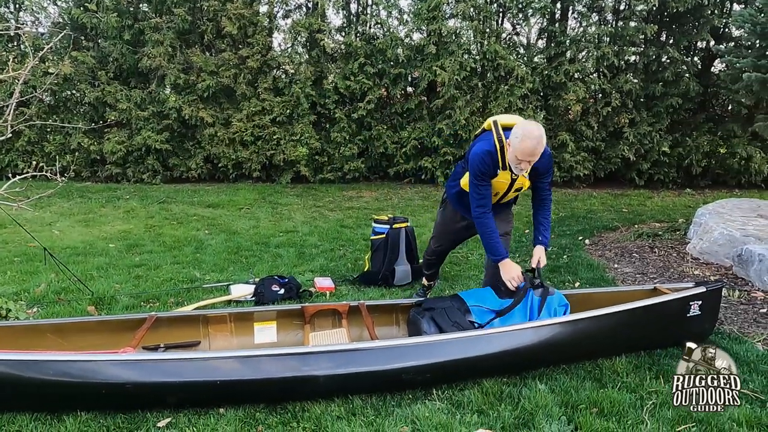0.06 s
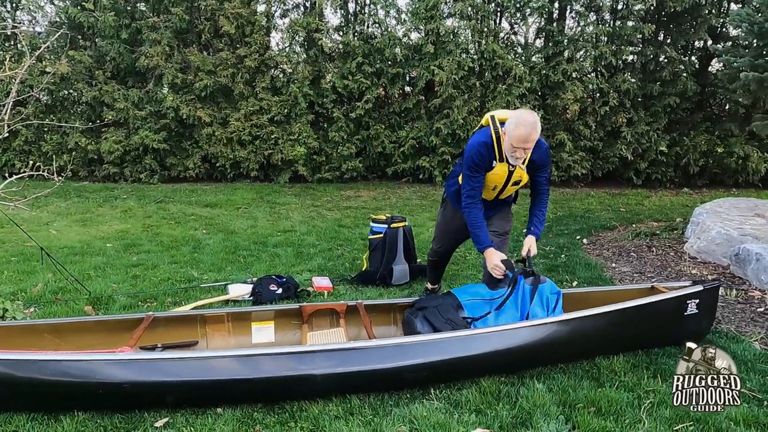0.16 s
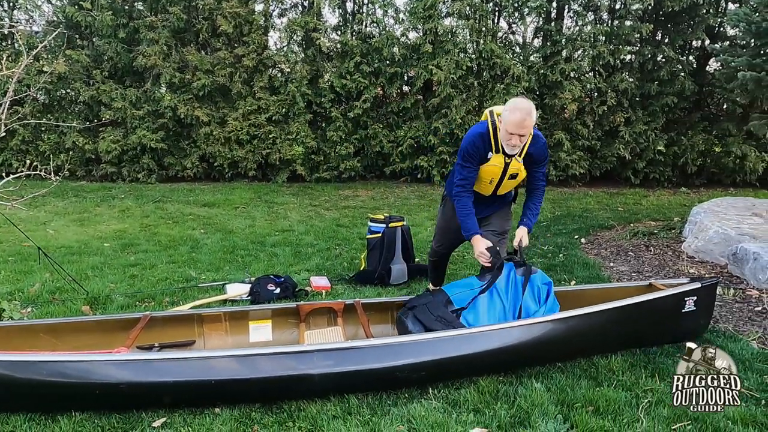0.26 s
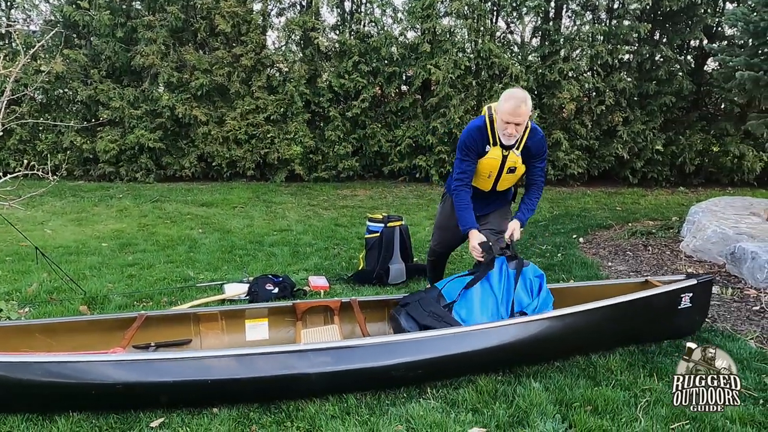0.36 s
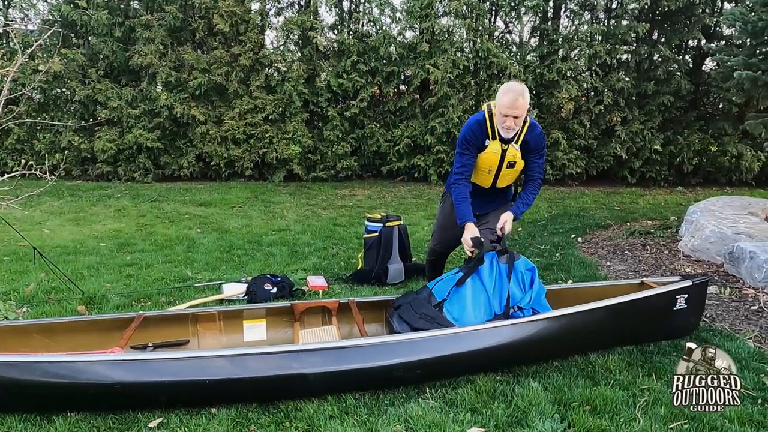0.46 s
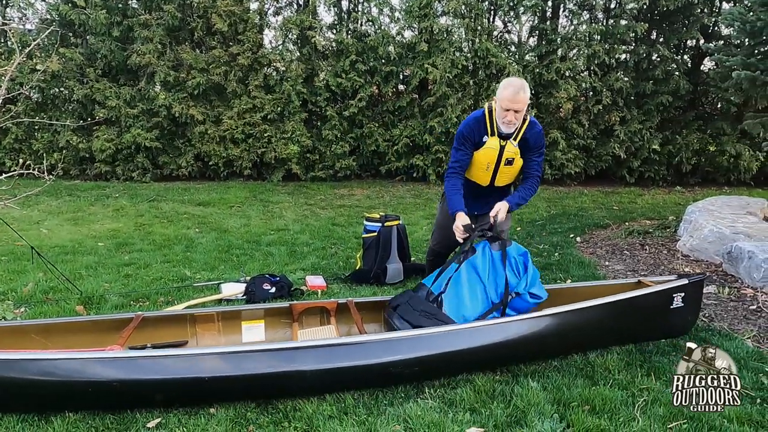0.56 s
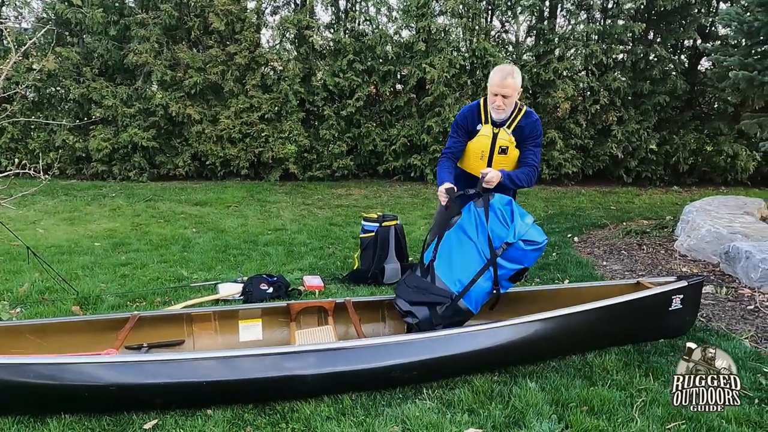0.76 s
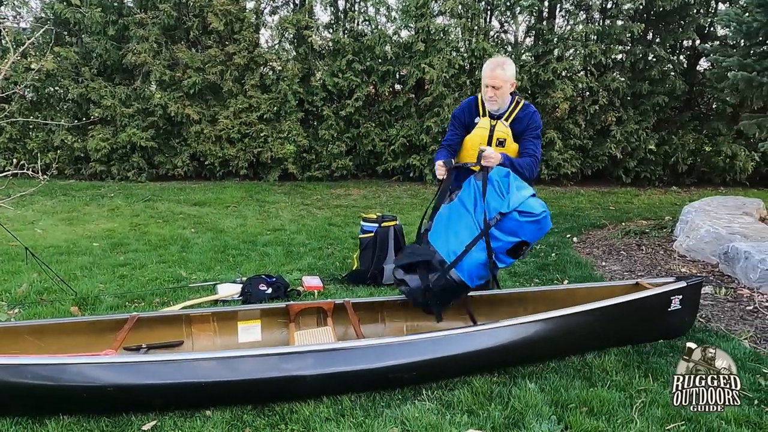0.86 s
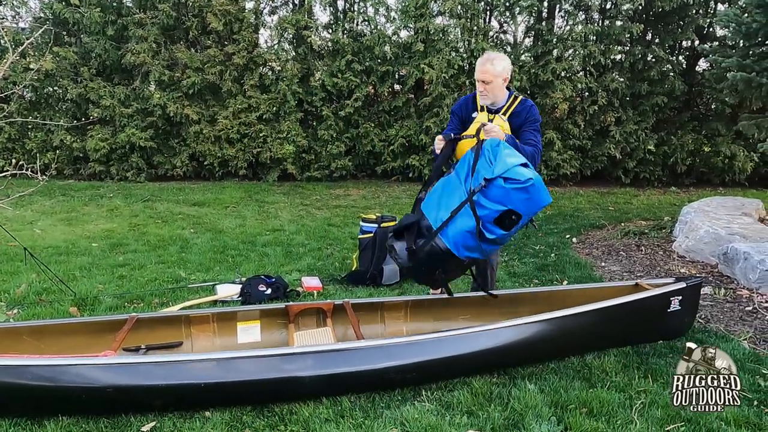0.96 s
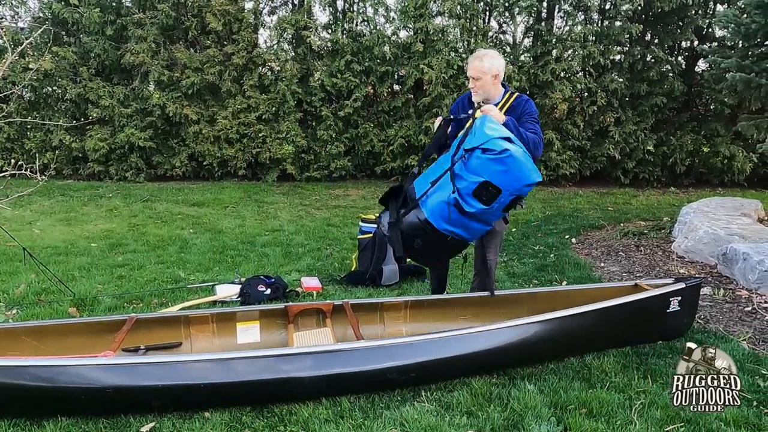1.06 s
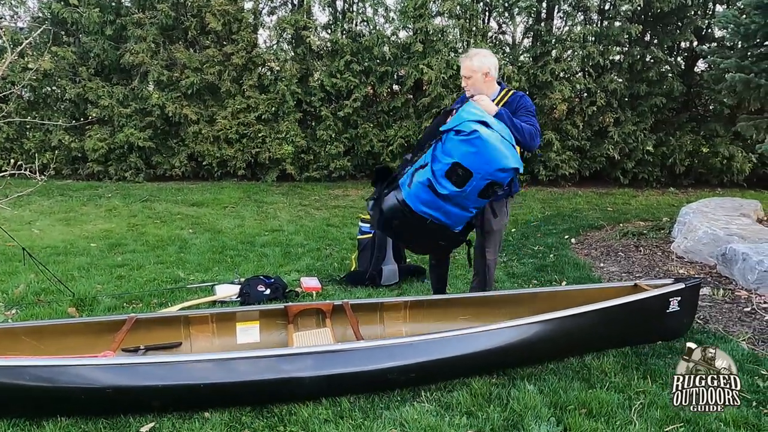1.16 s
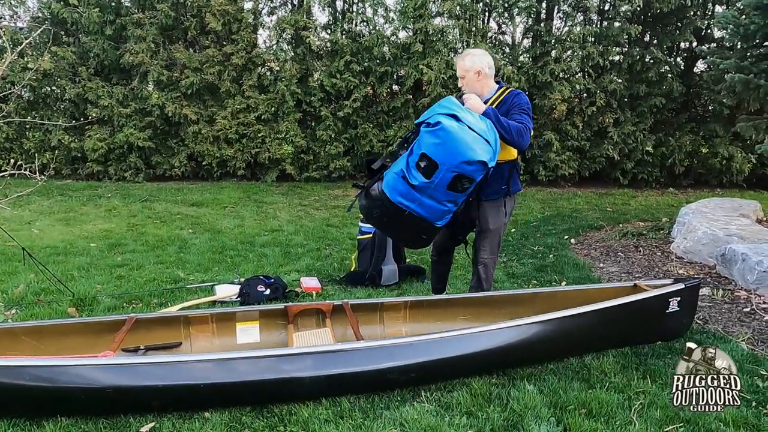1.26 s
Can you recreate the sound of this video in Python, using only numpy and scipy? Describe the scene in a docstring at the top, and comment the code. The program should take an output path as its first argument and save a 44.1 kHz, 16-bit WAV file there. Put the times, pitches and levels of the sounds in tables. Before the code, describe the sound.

A heavy bag scrapes and bumps over a thin canoe hull, straight ahead on a quiet lawn. The rubbing swells with hollow thumps, squeaky straps and buckle knocks, then dies away as the bag is lifted.

```python
"""On a quiet lawn, a heavy pack is dragged along the inside of a canoe and lifted clear.
Its fabric rubs over the thin hull, its weight thumps the floor, straps scrape and squeak,
buckles knock against the side and taut nylon swishes. The hull rings with the contacts and
rumbles as it shifts on the grass. Once the pack is in the air, only a faint rustle is left
over a soft bed of outdoor air."""
import sys
import numpy as np
from scipy import signal
from scipy.fft import rfft, irfft, next_fast_len
from scipy.io import wavfile
from scipy.ndimage import uniform_filter1d, minimum_filter1d

SR = 44100
rng = np.random.default_rng(int(sys.argv[2]) if len(sys.argv) > 2 else 0)


def bounce(signal):
    """Save signal as a 16-bit WAV file at the path given by the first command-line argument."""
    frames = np.transpose(np.atleast_2d(signal))
    limited = np.clip(frames, -1, 1)
    pcm = np.round(limited * 32767).astype(np.int16)
    wavfile.write(sys.argv[1], SR, pcm)


N = 57330
TIME = np.arange(N) / SR

# swell of the pack rubbing on the hull: (time [s], level [dB])
DRAG_ENVELOPE = [(0, -61), (.075, -49), (.095, -37.5), (.155, -42), (.22, -35), (.27, -30), (.31, -32.5),
                 (.46, -34), (.53, -23.5), (.62, -33.5), (.67, -26), (.755, -33.5), (.79, -26.5),
                 (.85, -26.5), (.945, -34.5), (1.0, -25), (1.07, -47), (1.17, -59.5), (1.3, -90)]
# warm body of the rub: (frequency [Hz], relative level [dB])
DRAG_EQ = [(40, -40), (100, -4), (200, 6), (340, 0.5), (600, 0), (1300, -7), (2500, -10.5), (4000, -18),
           (7000, -25), (12000, -35)]
# the load bumping the floor, pitched by where it presses: (time [s], level [dB], pitch [Hz])
THUMP_HITS = [(0.049, -35.5, 124), (.101, -36.5, 191), (0.274, -32, 228), (0.333, -26, 176),
              (.479, -10.5, 161), (.497, -12.5, 194.7), (.515, -8.5, 205), (0.539, -16, 254.7),
              (.556, -21.5, 251), (.581, -20.5, 255.4), (.603, -20, 246), (0.642, -18, 164),
              (.690, -27.5, 256), (0.833, -18.5, 264), (0.889, -16, 224), (.913, -20, 194),
              (.969, -20.5, 270.6), (1.008, -26.5, 263)]
# floor, damped by the load: (multiple of the pitch, relative level [dB], t60 [s])
LOADED_FLOOR_MODES = [(.68, -11.5, 0.1), (1, 1.5, 0.13), (1.3, -12.5, 0.07)]
# straps scraping over the side: (time [s], attack [s], time to release [s], level [dB],
# bass [dB], treble [dB], squeak pitch [Hz], squeak gain [dB])
STRAP_STROKES = [(0.16, 0.0026, .024, -33.5, -6, -27, 1030, 3.5),
                 (0.231, 0.0012, 0.013, -38.5, 6, -7, 1710, 19.5),
                 (0.255, 0.01, 0.01, -36.5, 1, 8.5, 1760, 20),
                 (0.473, 0.0015, 0.0016, -30, -7, 2, 1296, 21.5),
                 (0.509, 0.0017, 0.012, -18.5, -9, -14, 1900, -4.5),
                 (0.555, 0.0031, 0.01, -25.5, 11, -27, 2520, -11),
                 (.579, 0.0047, 0.0038, -24, -2, -20, 1990, -15),
                 (0.645, .001, 0.0092, -26, 6.5, 0, 1405, -1.5),
                 (0.667, 0.011, 0.017, -22, 4, 8.5, 2030, -8), (0.784, 0.0043, .03, -26.5, -5, -9, 770, 1),
                 (0.827, 0.0027, 0.017, -29, 10.5, -2, 780, 0),
                 (0.865, 0.0036, 0.025, -16, -18.5, -0.5, 3280, 5),
                 (0.89, 0.007, 0.018, -18, 4, 0, 2680, 12), (.957, 0.0013, 0.011, -20, 0, 12.5, 650, 6),
                 (0.992, 0.0046, 0.013, -33, 4, 11, 1700, 12)]
# midrange rasp of the straps: (frequency [Hz], relative level [dB])
STRAP_EQ = [(50, -46), (200, 1), (340, 1), (550, 5.5), (900, -0.5), (1400, -2), (2200, -2), (3400, -7),
            (4500, -9), (7000, -18), (12000, -35.5)]
# buckles and frame striking the hull: (time [s], level [dB], bass [dB], treble [dB])
KNOCK_HITS = [(0.09, -32.5, -6, -3), (.234, -39, -8, -8), (0.329, -24, 2.5, -2), (.364, -40, -30, 15),
              (0.436, -33, -23, 7), (0.5248, -18.5, 7, -22), (0.7661, -14.5, -33, 1),
              (.773, -14, -1.5, -23), (0.963, -28, 5, -8)]
# hollow tone of the knocks: (frequency [Hz], relative level [dB])
KNOCK_EQ = [(50, -5), (200, 6), (400, 2.5), (750, 9.5), (1400, -0.5), (2500, -2), (4500, -8), (7000, -16),
            (12000, -29)]
# free sides of the hull: (frequency [Hz], relative level [dB], t60 [s])
SIDE_MODES = [(98, -8, .3), (194, 2, .28), (246, 4, .33), (278, 0, .28), (403, -4, .22), (438, -4, .25),
              (524, 1, .22), (607, -5, .16), (846, 0, .12), (932, -4, .10), (1030, -4, .08),
              (2271, -2, .08), (2810, -3, .06), (3358, -5, .08)]
# taut nylon sliding: (peak time [s], half length [s], level [dB])
NYLON_SWELLS = [(0.5, 0.0061, -50), (0.685, 0.0087, -37), (0.907, 0.01, -38.5), (0.974, 0.0044, -53),
                (0.994, 0.0059, -60)]
# sheen of the nylon: (frequency [Hz], relative level [dB])
NYLON_EQ = [(1000, -30), (3000, -6), (6500, -13), (9000, 4), (11500, 9), (14000, -25)]
# the whole canoe shifting under the load: (time [s], level [dB])
RUMBLE_ENVELOPE = [(0, -44.5), (.25, -45.5), (.5, -43), (.72, -40), (.92, -74), (1.05, -45.5), (1.3, -61)]
# low weight of that shifting: (frequency [Hz], relative level [dB])
RUMBLE_EQ = [(25, -19), (45, -3), (70, 1), (130, 5), (250, -24.5), (800, -44.5)]
# outdoor bed: (frequency [Hz], relative level [dB])
AIR_EQ = [(25, -24), (60, -15.5), (115, 1.5), (180, -7), (350, -16.5), (800, -23), (1600, -28.5),
          (2600, -25), (4500, -39), (12000, -63)]


def drag():
    """The pack's fabric bottom rubs along the hull in uneven swells."""
    return coloured(friction(judder_db=1.64) * envelope(DRAG_ENVELOPE), DRAG_EQ)


def friction(judder_db, judder_hz=104, catches_per_s=4500, spread_db=0.93, hiss_gain=0.66):
    """The weave catches in tiny grains over a smooth hiss, juddering as it sticks and slips."""
    sizes = from_db(spread_db * np.minimum(rng.exponential(1, N), 3)) * rng.choice([-1, 1], N)
    catches = rms_one(sizes * (rng.random(N) < catches_per_s / SR))
    judder = rms_one(butter(rng.standard_normal(N), judder_hz, "low"))
    hiss = hiss_gain * rng.standard_normal(N)
    return rms_one((catches + hiss) * from_db(judder_db * judder))


def floor_thumps(contact_s=0.0026):
    """Soft pushes from the pack's weight set the loaded floor booming briefly."""
    boom = 0
    for start, db, hz in THUMP_HITS:
        push = np.sin(np.pi * np.clip((TIME - start) / contact_s, 0, 1))
        force = from_db(db) * push / push.sum() + 1e-18
        for multiple, mode_db, t60 in LOADED_FLOOR_MODES:
            radius = np.exp(-np.log(1000) / (t60 * SR))
            angle = 2 * np.pi * hz * multiple / SR
            ring = signal.lfilter([0, np.sin(angle)], [1, -2 * radius * np.cos(angle), radius ** 2], force)
            boom += from_db(mode_db) * ring
    return butter(boom, hz=129, kind="high")  # the thin shell radiates little deep bass


def strap_scrapes(release_s=0.0088):
    """Each strap bites quickly, slides with a rough squeak of its own pitch and lets go."""
    straps, grain = 0, friction(judder_db=1.27)
    for start, attack, length, db, bass_db, treble_db, squeak_hz, squeak_db in STRAP_STROKES:
        age = TIME - start
        bite = np.clip(age / attack, 0, 1)
        release = np.exp(-np.maximum(age - length, 0) / release_s)
        rub = from_db(db) * grain * bite * release
        squeak = from_db(squeak_db) * resonance(rub, squeak_hz, width_hz=238)
        straps += shelves(rub, bass_db, treble_db) + squeak
    return coloured(straps, STRAP_EQ)


def buckle_knocks(rattle_db=-10.5):
    """Buckles and frame hit the hull, each with a hard crack and a short rattle."""
    knocks, grain = 0, rng.choice([-1., 1.], N)
    for start, db, bass_db, treble_db in KNOCK_HITS:
        crack = dying(start, decay_s=0.003)
        rattle = from_db(rattle_db) * dying(start, decay_s=0.03)
        knocks += shelves(from_db(db) * grain * (crack + rattle), bass_db, treble_db)
    return coloured(knocks, KNOCK_EQ)


def hull_ring(force, gain_db=0.5):
    """The thin sides ring with whatever touches them."""
    return sum(from_db(gain_db + db) * resonance(force, hz, width_hz=np.log(1000) / (np.pi * t60))
               for hz, db, t60 in SIDE_MODES)


def nylon_swishes():
    """Taut nylon slides in brief, bright swells of hiss."""
    swell = sum(from_db(db) * np.exp(-.5 * ((TIME - peak) / half) ** 2)
                for peak, half, db in NYLON_SWELLS)
    return coloured(swell * rng.standard_normal(N), NYLON_EQ)


def hull_rumble():
    """The hull rumbles as it shifts on the grass."""
    return envelope(RUMBLE_ENVELOPE) * coloured(rng.standard_normal(N), RUMBLE_EQ)


def garden_echo(x, send_db=-24.5, predelay_s=0.017, t60_s=0.48):
    """Lawn and hedge scatter back a weak tail with a softened top."""
    tail = rng.standard_normal(N) * dying(predelay_s, t60_s / np.log(1000))
    scatter = butter(tail, hz=8400, kind="low")
    return from_db(send_db) * signal.fftconvolve(x, scatter / np.linalg.norm(scatter))[:N]


def outdoor_air(level_db=-45):
    """A steady, low hush lies under the action."""
    return from_db(level_db) * coloured(rng.standard_normal(N), AIR_EQ)


def widen(mid, above_hz=10700, side_db=-12.5):
    """The highest hiss reaches each ear differently; all else is centred."""
    top = butter(butter(mid, above_hz, "high", order=8), above_hz, "high", order=8)
    top_level = np.sqrt(np.maximum(uniform_filter1d(top ** 2, size=128), 0))
    hiss = butter(rng.standard_normal(N), above_hz, "high", order=12)
    hiss = butter(hiss, hz=12600, kind="low", order=8)
    side = from_db(side_db) * top_level * rms_one(hiss)
    return np.array([mid + side, mid - side])


def from_db(db):
    """Decibels to gain."""
    return 10 ** (np.asarray(db) / 20)


def rms_one(x):
    """Scale to unit level."""
    return x / np.sqrt(np.mean(x ** 2) + 1e-20)


def envelope(points):
    """A fader ride through (time [s], level [dB]) points."""
    return from_db(np.interp(TIME, *np.transpose(points)))


def dying(start, decay_s):
    """Instant attack, exponential decay."""
    return (TIME >= start) * np.exp(-np.maximum(TIME - start, 0) / decay_s)


def butter(x, hz, kind, order=2):
    """Plain low- or high-pass."""
    return signal.sosfilt(signal.butter(order, hz, kind, fs=SR, output="sos"), x + 1e-18)


def coloured(x, eq):
    """Apply an EQ curve, scaled so that white noise keeps its level."""
    size = next_fast_len(2 * N) // 2 * 2
    hz, db = np.transpose(eq)
    bin_hz = np.arange(size // 2 + 1) * SR / size
    gain = rms_one(from_db(np.interp(np.log(bin_hz + 1), np.log(hz), db)))
    # minimum phase: nothing rings ahead of an attack
    cepstrum = irfft(np.log(gain))
    cepstrum[1:size // 2] *= 2
    cepstrum[size // 2 + 1:] = 0
    return irfft(rfft(x, size) * np.exp(rfft(cepstrum)))[:N]


def shelves(x, bass_db, treble_db, bass_hz=600, treble_hz=4200):
    """Bass and treble shelves for one contact."""
    x = x + (from_db(bass_db) - 1) * butter(x, bass_hz, "low", order=1)
    low, high = (butter(butter(x, treble_hz, kind), treble_hz, kind) for kind in ("low", "high"))
    return low + from_db(treble_db) * high


def resonance(x, hz, width_hz):
    """A resonant peak at unity gain."""
    radius, angle = np.exp(-np.pi * width_hz / SR), 2 * np.pi * hz / SR
    feedback = [1, -2 * radius * np.cos(angle), radius ** 2]
    return (1 - radius ** 2) / 2 * signal.lfilter([1, 0, -1], feedback, x + 1e-18)


def scene():
    """Pack and canoe straight ahead, over the outdoor bed."""
    contact = drag() + strap_scrapes() + buckle_knocks()
    boom = floor_thumps()
    ring = hull_ring(contact + from_db(4) * boom)  # thumps drive the sides harder
    canoe = contact + boom + ring + hull_rumble() + nylon_swishes()
    return widen(canoe + garden_echo(canoe) + outdoor_air())


def record(dry, dip_hz=8950, dip_width_hz=5300, ceiling=.56, hold_s=.003, cutoff_hz=12600):
    """The microphone dips in the high treble, a fast limiter holds the peaks, the top is cut."""
    dipped = signal.lfilter(*signal.iirnotch(dip_hz, dip_hz / dip_width_hz, fs=SR), dry)
    hold = int(hold_s * SR)
    needed_gain = ceiling / np.maximum(np.abs(dipped).max(axis=0), ceiling)
    smooth_gain = uniform_filter1d(minimum_filter1d(needed_gain, hold), hold)
    return butter(dipped * smooth_gain, cutoff_hz, "low", order=14)


dry = scene()
out = record(dry)
bounce(out)
```